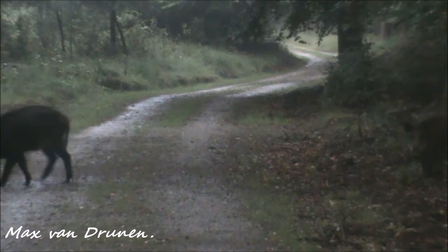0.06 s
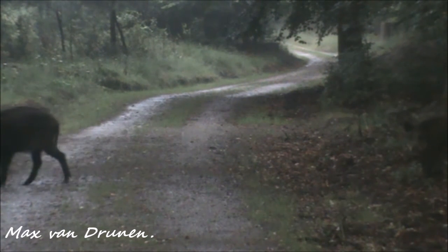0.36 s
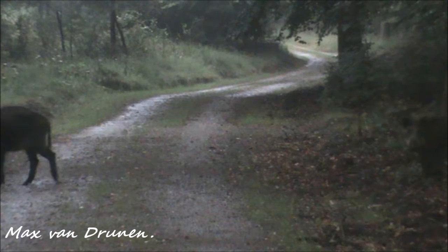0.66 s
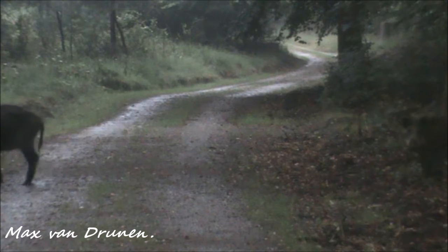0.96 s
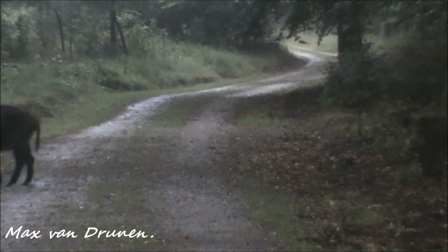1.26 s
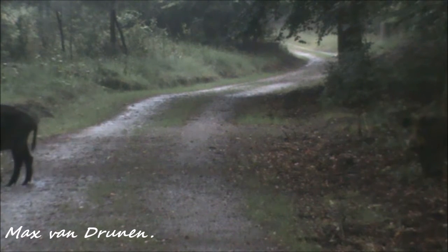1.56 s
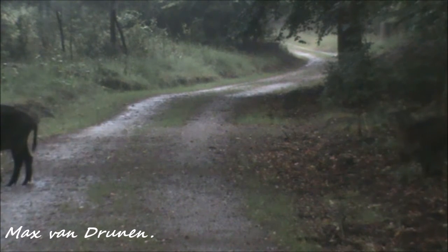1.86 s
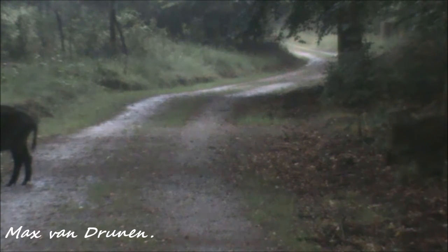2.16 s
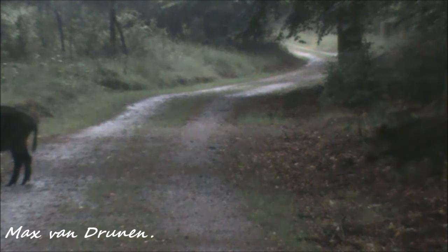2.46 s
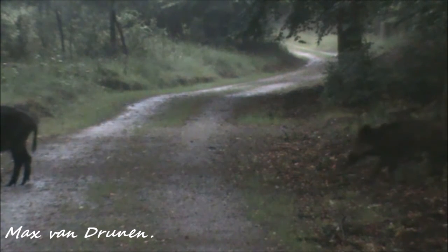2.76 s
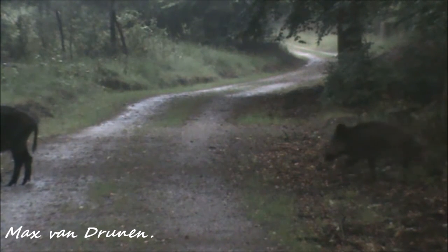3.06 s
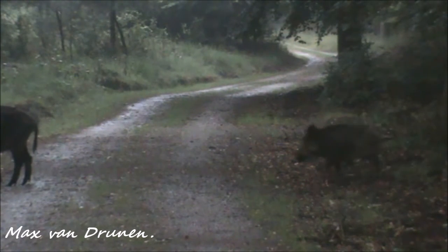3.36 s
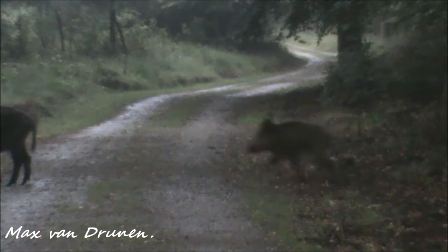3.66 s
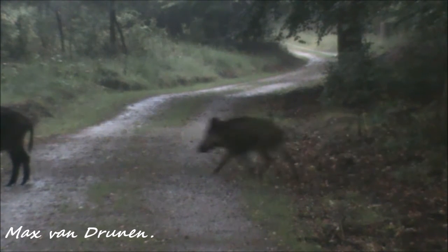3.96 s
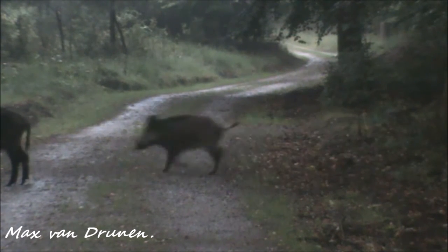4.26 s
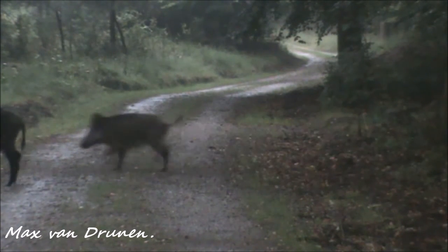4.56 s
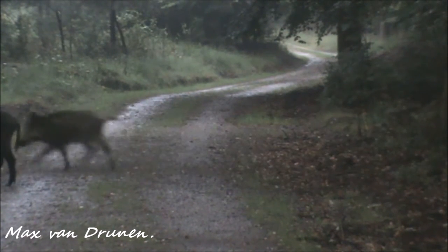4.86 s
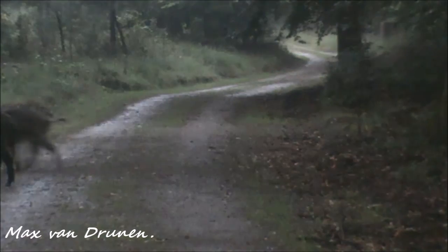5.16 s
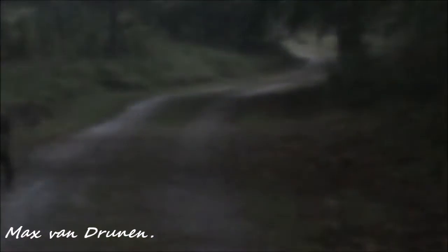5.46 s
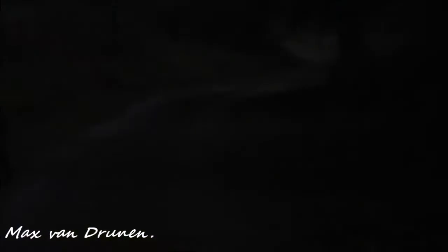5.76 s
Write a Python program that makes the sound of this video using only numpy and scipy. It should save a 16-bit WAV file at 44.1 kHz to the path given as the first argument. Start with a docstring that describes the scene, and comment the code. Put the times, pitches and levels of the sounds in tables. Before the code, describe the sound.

A steady rain shower falls in a forest. Fat drops smack on leaves and wet ground close to the microphone, several each second in an irregular rhythm, each a short, crisp tick with its own pitch. A few land with a soft, dull thud. Smaller drops patter all around, and a faint hiss of farther rain lies behind them throughout.

```python
"""A wood in a steady shower. Fat drops from the canopy smack on leaves and wet ground near the microphone:
each impact is a pressure spike with a short splash, and excites the resonance of a leaf. A few land
with a soft, damped thud. Smaller drops patter all round, their amplitude falling inversely with distance.
The wet ground reflects a dull echo of all these drops, and the countless impacts farther off
merge by superposition into a wash of noise."""
import sys
import numpy as np
from scipy import signal
from scipy.fft import rfft, irfft
from scipy.io import wavfile

SR = 44100
rng = np.random.default_rng(int(sys.argv[2]) if len(sys.argv) > 2 else 0)


def output_pcm(signal):
    """Save a mono or channel-first signal as 16-bit PCM at the path in sys.argv[1].

    Samples are clipped to [-1, 1] before scaling.
    """
    pcm = np.clip(np.atleast_2d(signal).T, -1, 1) * 32767
    wavfile.write(sys.argv[1], SR, np.round(pcm).astype(np.int16))


N = 261513

# the nearest fat drops:
# (time [s], relative level [dB], brightness [dB/octave], leaf pitch [Hz], gain at that pitch [dB])
NEAR_DROPS = [(0.0138, -30.5, -1, 1610, 1), (0.0854, -29.5, 3.5, 470, 15), (0.1492, -26.0, -0.5, 1540, 6),
              (0.1738, -27, 2.0, 4830, 11), (0.1967, -33.5, -6, 2070, 12), (0.215, -28.5, -0.5, 2070, 10),
              (0.2802, -22, -2.5, 4200, 7), (0.3034, -26.5, -5, 1600, 12), (0.3154, -31.5, 0, 1610, 14),
              (0.3204, -29, -1, 1690, 3), (0.4467, -33.5, -3.5, 4600, 7.5), (0.4967, -28, -1, 2180, 6),
              (0.553, -22.5, 0.0, 1320, 9), (0.5637, -35, 1.5, 1780, 7.5), (0.6608, -32, -0.5, 1700, 7),
              (0.717, -29.5, 0, 4830, 8.5), (0.7729, -23.5, -1.5, 1390, 7.5),
              (0.8118, -22.5, 0.5, 2770, 13), (0.8669, -26, 0.0, 3580, 7), (0.8803, -24.0, 1, 3400, 11),
              (0.89, -30, -4.5, 4370, 9), (0.9353, -32, -1.5, 890, 0), (0.9779, -33, 0.5, 2790, 12),
              (1.0947, -28.5, -0.5, 2940, 13), (1.1201, -24, -0.5, 2290, 3), (1.131, -32.5, -2, 6200, 7),
              (1.2928, -27, 1, 4160, 4.5), (1.3664, -26, 0.0, 6200, 6.5), (1.3722, -26, -0.5, 5050, 15),
              (1.4198, -23, -1.5, 2180, 3), (1.4281, -38, -4, 2070, -1), (1.4432, -25.5, -1.5, 2680, 8),
              (1.6647, -25.5, -0.5, 1460, 8), (1.6965, -30, -1.5, 5080, 11), (1.7639, -27, -0.5, 730, 3),
              (1.8563, -27.5, -3, 3600, 8.5), (1.9219, -31.5, 0, 1700, 4), (1.9851, -25, 0.5, 4000, 15),
              (2.0749, -31.5, -0.5, 1460, 4), (2.1019, -33, 2, 3960, 9), (2.1926, -25.5, 0.5, 3580, 10.5),
              (2.2394, -26, 1, 1540, 7.5), (2.3028, -28, 1, 3090, 12), (2.3081, -26, 0.5, 2070, 5),
              (2.3743, -23, -0.5, 800, 3.5), (2.6035, -26, -0.5, 2920, 9.5), (2.6249, -24.5, 0.0, 400, 4),
              (2.6522, -27, -0.5, 3180, 8), (2.6678, -33, 2.0, 1870, 10), (2.6895, -22.5, 2, 1980, 5.5),
              (2.7092, -25, 1, 3090, 9), (2.7427, -30.5, 1, 3410, 10), (2.7492, -28.5, -2, 1260, 5),
              (2.7568, -35, 3, 2940, 14), (2.7633, -36, -3, 2660, 15), (2.7943, -29, 1.5, 4160, 4),
              (2.8662, -30.0, 0, 4830, 7), (2.9139, -30.5, 0.5, 4160, 5), (2.9541, -23.5, 3, 1540, 12),
              (3.0024, -26.5, 1.0, 930, 5.5), (3.0346, -26, 0, 4600, 6), (3.0771, -27, -1.0, 1780, 7.5),
              (3.148, -29.5, -3, 3090, 13), (3.1769, -26.5, -1.0, 1320, 2), (3.2226, -27.5, -1.5, 3740, 16),
              (3.3006, -31.5, -1, 4830, 6), (3.314, -26.5, 1.5, 1320, 6), (3.3188, -26.5, -0.5, 3770, 7),
              (3.3247, -26, 0.5, 2180, 8.5), (3.4824, -26, 3, 1880, 28), (3.55, -27, -1.5, 1080, 1),
              (3.6229, -34, -2.5, 3960, 8), (3.6595, -29.5, -3, 2800, 12), (3.683, -29, 0, 3960, -1),
              (3.7818, -24.5, 0.5, 1320, 6), (3.8128, -32.5, 0.0, 400, 9), (3.8311, -26, -1.5, 2660, 10),
              (3.854, -25.5, 1.5, 840, 5), (3.8813, -23.5, -2.5, 1070, 7), (3.9124, -20, -2.5, 4830, 5.5),
              (3.9732, -23, -1.0, 1860, 6), (4.0391, -31.0, -0.5, 2940, 6), (4.1096, -32.5, 1, 2530, 12),
              (4.1196, -30.5, -1.5, 4830, 11), (4.1631, -23.5, -1.5, 3410, 2),
              (4.2329, -27.5, 0.5, 4600, 4), (4.3286, -26.5, -1.0, 6200, 5), (4.3679, -22.5, 0.0, 4430, 7),
              (4.4297, -27.0, -1, 2070, 8.5), (4.4814, -24.5, -0.5, 1870, 2.5),
              (4.5324, -25.5, 2, 1460, 12), (4.584, -26, 2.5, 6070, 7), (4.6644, -25.5, -0.5, 2290, 6.5),
              (4.8093, -28, 0, 1390, 8), (4.8605, -28.5, 0.5, 2940, 3), (5.0508, -32, 2, 5900, 7),
              (5.1284, -30, -0.5, 2400, 10), (5.2174, -28.5, -1, 3580, 6), (5.2418, -32, 1.5, 5610, 8),
              (5.2567, -25.0, -0.5, 6300, 6.5), (5.2858, -27, -2, 895, 7), (5.2966, -33, 0.0, 2100, 14),
              (5.3376, -30, -2, 600, 7.5), (5.3522, -26.0, 0.5, 6200, 5), (5.3634, -29.5, 3, 1780, 6),
              (5.3707, -32, 2.0, 1600, 20), (5.3892, -26.5, -0.5, 1080, 0), (5.4569, -33.0, -2.5, 6200, 14),
              (5.4696, -29.5, 1.5, 3090, 6), (5.4828, -25.5, 0.5, 4630, 5), (5.5244, -26, -2, 2410, 8),
              (5.5374, -33.0, 1.5, 2790, 3), (5.5476, -29, -2.5, 3090, 6), (5.5587, -21.5, -1, 1970, 8),
              (5.5694, -31.5, -0.5, 2180, 13), (5.6045, -32, 2, 4830, 10), (5.6136, -29.5, -1.0, 5900, 9),
              (5.6727, -29, -0.5, 4600, 9), (5.7064, -26.5, 2.5, 4370, 9), (5.7132, -27.5, 1.5, 1970, 10),
              (5.7551, -22.5, -0.5, 4370, 8.5), (5.8009, -30.5, -3, 2790, 9), (5.8196, -29, -0.5, 3960, 4),
              (5.8425, -26.5, 1.5, 5300, 3), (5.8658, -25.5, 4, 1700, 13), (5.8743, -35, -1, 1460, 1),
              (5.8838, -25.5, -0.5, 1870, 11), (5.9132, -31.0, -4, 3960, 9), (5.9197, -24.5, -0.5, 4370, 7)]
# bounds of a fat drop's four bands, thud, body, snap and spray: (frequency [Hz])
PART_EDGES_HZ = [140, 640, 2200, 6100, 13800]
# balance of those bands in an average drop: (relative level [dB])
PART_LEVELS_DB = [-7, 1.16, -1.4, -4]
# heavy drops on something soft: (time [s], relative level [dB], pitch [Hz])
SOFT_LANDINGS = [(0.2797, -16.5, 386), (1.148, -29, 280), (2.198, -27, 129), (5.1062, -13.5, 364),
                 (5.1110, -22, 344), (5.2162, -29, 120)]
# strength of the shower: (time [s], relative level [dB])
SHOWER_STRENGTH = [(0, -42), (0.12, -42), (0.31, -38.5), (0.42, -41.0), (0.78, -42.5), (1.95, -41),
                   (2.3, -41.5), (2.56, -43), (2.68, -38), (2.88, -42), (3.3, -40.5), (3.9, -41),
                   (4.22, -42.9), (5.16, -42.5), (5.28, -38), (5.43, -39.9), (5.55, -39.0), (5.93, -37.5)]
# spectrum of the small drops: (frequency [Hz], relative spectral density [dB])
PATTER_SPECTRUM = [(25, -22), (70, -11), (160, -1.5), (350, 6.5), (900, 9), (1700, 8.5), (2600, 6.5),
                   (4000, 3), (5400, -2.5), (7400, -2.5), (10200, -4.5), (13000, -5), (16000, -18)]
# spectrum of the far rain: (frequency [Hz], relative spectral density [dB])
WASH_SPECTRUM = [(15, -35), (30, -8), (65, 1), (120, -4.5), (350, -3), (850, -6), (1750, -5), (2500, -4),
                 (4900, -1), (5900, -3.5), (7450, -13), (10500, -8), (14000, -24), (16000, -18)]
# stereo width of the far rain: (frequency [Hz], relative gain of the side signal [dB])
WASH_WIDTH = [(60, -16), (200, -13), (700, -13), (2000, -13), (4500, -12), (6000, -6), (8000, -5),
              (15000, -8)]

SIDES = np.array([[1], [-1]])   # opposite signs for left and right


def fat_drops(rows, splash_db, splash_s, rustle_db, rustle_s, width, pan_db, spike_db, size=1400):
    """Impact excitation: a pressure spike and a splash that decays into a rustle set a leaf ringing."""
    times, level_db, bright_db, leaf_hz, ring_db = np.transpose(rows)
    t = np.arange(size) / SR
    noise = rng.standard_normal((len(times), 3, size))   # mid, side, pan
    decay = from_db(splash_db) * np.exp(-t / splash_s) + from_db(rustle_db) * np.exp(-t / rustle_s)
    spike = from_db(spike_db) * housing_echo((t == 0) * 1.0, echo_db=-9.5)
    splash = housing_echo(decay * noise[:, :2], echo_db=-10.5)
    blows = 0
    for k, part_db in enumerate(PART_LEVELS_DB):
        impact = spike + splash[:, :1] + width[k] * SIDES * splash[:, 1:]
        low_hz, high_hz = PART_EDGES_HZ[k:k + 2]
        octave = np.log2(np.sqrt(low_hz * high_hz))
        part = at_level(band(impact, low_hz, high_hz), part_db + bright_db * octave)
        blows = blows + (-1) ** k * part   # alternating signs join the bands without a notch
    blows = np.array([leaf_ring(*drop) for drop in zip(blows, leaf_hz, ring_db)])
    pan = from_db(pan_db * noise[:, 2:, :1] * SIDES)
    return place(times, at_level(blows, level_db) * pan)


def leaf_ring(blow, leaf_hz, ring_db, q=3.5):
    """Damped resonance: a struck leaf lifts the band round its pitch and rings for a few cycles."""
    resonance = signal.iirpeak(leaf_hz, q, fs=SR)
    return blow + (from_db(ring_db) - 1) * signal.lfilter(*resonance, blow)


def housing_echo(x, echo_db, lag_s=.000195):
    """Comb filtering: one reflection off the microphone housing cuts hollows near 2.6 and 7.7 kHz."""
    size = x.shape[-1]
    hz = np.fft.rfftfreq(2 * size, 1 / SR)
    reflection = from_db(echo_db) * np.exp(-2j * np.pi * hz * lag_s)
    return irfft(rfft(x, 2 * size) * (1 + reflection))[..., :size]


def thuds(cycles, gain_db, size=2000):
    """Damped oscillation: a soft landing gives a low swing that decays by 60 dB over the given cycles."""
    times, level_db, hz = np.transpose(SOFT_LANDINGS)
    turns = hz[:, None] * np.arange(size) / SR
    swing = from_db(level_db + gain_db)[:, None] * np.sin(2 * np.pi * turns) * from_db(-60 * turns / cycles)
    return band(place(times, np.stack([swing, swing], 1)), 114, 1500)   # no net push of air


def farther_drops(swell_db, per_s, level_db, spread_db, bright_db, bright_spread_db,
                  low_hz, high_hz, ring_db, count=600):
    """Random arrivals: rows for fat drops a few steps away, at a rate proportional to the shower's power."""
    when, luck, size, tone, pitch = rng.random((count, 5)).T
    rate = per_s * from_db(2 * swell_db[(when * N).astype(int)])
    levels = level_db + spread_db * (2 * size - 1)
    brightness = bright_db + bright_spread_db * (2 * tone - 1)
    leaf_hz = low_hz * (high_hz / low_hz) ** pitch
    rows = np.transpose([when * N / SR, levels, brightness, leaf_hz, np.full(count, ring_db)])
    return rows[luck < rate * N / SR / count]


def patter(per_s, nearest, splash_db, splash_s, width, pan_db, size=200):
    """Spherical spreading: of small drops falling evenly over a disc, the few near ones stand out."""
    count = int(per_s * N / SR)
    when, area = rng.random((count, 2)).T
    noise = rng.standard_normal((count, 3, size))   # mid, side, pan and tilt
    distance = np.sqrt(nearest ** 2 + area)   # in radii of the disc
    t = np.arange(size) / SR
    splash = from_db(splash_db) * np.exp(-t / splash_s) * (noise[:, :1] + width * SIDES * noise[:, 1:2])
    pan = from_db(pan_db * noise[:, 2:, :1] * SIDES)
    blows = ((t == 0) + splash) / distance[:, None, None] * pan
    lows = signal.lfilter(*signal.butter(1, 2500, fs=SR), blows)
    tilt = from_db(4 * np.tanh(noise[:, 2:, 1:2]))   # some land dull, some bright
    ticks = lows / tilt + (blows - lows) * tilt
    return unit_rms(coloured(place(when * N / SR, ticks), PATTER_SPECTRUM))


def ground_echo(x, lag_s, echo_db, dull_hz):
    """Reflection: the wet ground adds a dull copy, delayed by its longer path."""
    n = np.arange(N)
    delayed = np.array([np.interp(n - lag_s * SR, n, channel, left=0) for channel in x])
    return x + from_db(echo_db) * low_pass(delayed, dull_hz)


def wash(side_db):
    """Incoherent superposition: far drops merge into noise, less alike in the two ears in the treble."""
    mid, side = coloured(rng.standard_normal((2, N)), WASH_SPECTRUM)
    return unit_rms(mid + from_db(side_db) * coloured(side[None], WASH_WIDTH) * SIDES)


def from_db(db):
    """Amplitude ratio of a level in decibels."""
    return 10 ** (np.asarray(db) / 20)


def unit_rms(x):
    """Normalisation to unit mean power."""
    return x / np.sqrt(np.mean(x ** 2) + 1e-20)


def at_level(blows, level_db, blow_s=.005):
    """Energy normalisation: each blow takes the given rms level, its energy reckoned over blow_s."""
    rms = np.sqrt(np.mean(np.sum(blows ** 2, -1), -1) / (blow_s * SR))
    return blows * (from_db(level_db) / rms)[:, None, None]


def band(x, low_hz, high_hz):
    """Causal band-pass, 12 dB an octave on each side."""
    return signal.sosfilt(signal.butter(2, [low_hz, high_hz], "band", fs=SR, output="sos"), x + 1e-18)


def low_pass(x, corner_hz):
    """Causal low-pass, 12 dB an octave."""
    return signal.sosfilt(signal.butter(2, corner_hz, fs=SR, output="sos"), x + 1e-18)


def coloured(x, spectrum, size=4096):
    """Minimum-phase filtering: the spectrum is shaped while ticks keep their sharp front."""
    hz = np.maximum(np.fft.rfftfreq(size, 1 / SR), 1)
    points_hz, points_db = np.transpose(spectrum)
    gain = from_db(np.interp(np.log(hz), np.log(points_hz), points_db))
    cepstrum = irfft(np.log(gain))
    cepstrum[1:size // 2] *= 2   # fold onto positive time
    cepstrum[size // 2 + 1:] = 0
    response = irfft(np.exp(rfft(cepstrum)))
    return signal.fftconvolve(x, response[None], axes=1)[:, :N]


def place(times, sounds):
    """Superposition of stereo sounds (events, 2, samples), each starting at its time."""
    out = np.zeros((2, N + sounds.shape[-1]))
    for time, sound in zip(times, sounds):
        start = int(time * SR)
        out[:, start:start + sound.shape[-1]] += sound
    return out[:, :N]


def scene():
    """The sources add linearly; the shower's strength drives the farther drops, the patter and the wash."""
    shower_db = np.interp(np.arange(N) / SR, *np.transpose(SHOWER_STRENGTH))
    swell_db = shower_db - np.mean(shower_db)
    farther = farther_drops(swell_db, per_s=10, level_db=-37, spread_db=1.5, bright_db=-0.2,
                            bright_spread_db=4.0, low_hz=910, high_hz=6040, ring_db=8)
    fat = fat_drops(np.vstack([NEAR_DROPS, farther]), splash_db=-21.5, splash_s=0.0018,
                    rustle_db=-33.5, rustle_s=0.01, pan_db=0.17, spike_db=0.3,
                    width=[0.2, 0.28, 0.2, 0.76])   # the fine spray differs most between the ears
    small = patter(per_s=600, nearest=0.12, splash_db=-17.5, splash_s=0.0016, width=0.57, pan_db=0.3)
    drops = from_db(1.33) * fat + thuds(cycles=3.4, gain_db=3.0) + from_db(shower_db - 1.0) * small
    near = ground_echo(drops, lag_s=0.006, echo_db=-19, dull_hz=2130)
    far = from_db(1.06 * swell_db - 43.0) * wash(side_db=-0.5)
    return (near + far) * from_db(-.25 * SIDES)


def record(dry, ceiling=.55, cutoff_hz=16000):
    """Saturation and band limiting: the microphone rounds the tallest spikes and loses the top treble."""
    rounded = ceiling * np.tanh(low_pass(dry, 15900) / ceiling)
    return signal.sosfilt(signal.ellip(10, .2, 80, cutoff_hz, fs=SR, output="sos"), rounded)


dry = scene()
out = record(dry)
output_pcm(out)
```